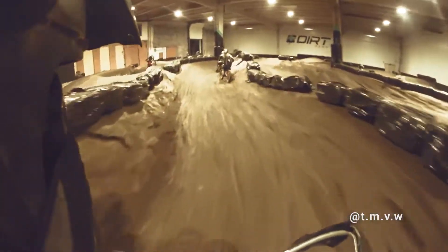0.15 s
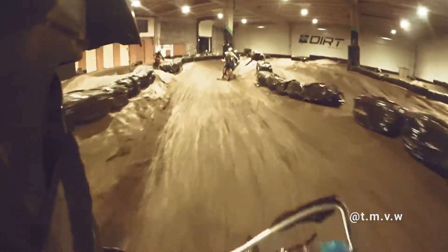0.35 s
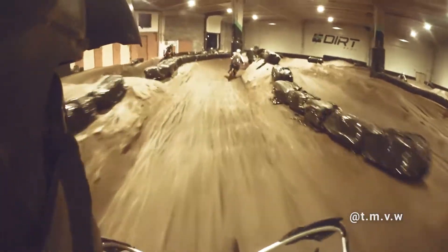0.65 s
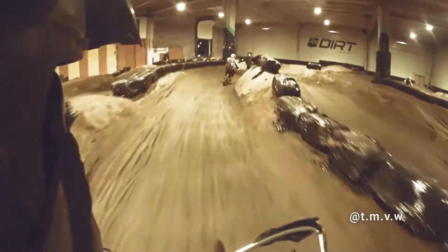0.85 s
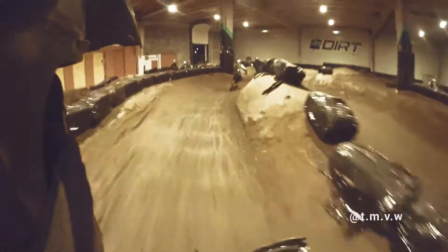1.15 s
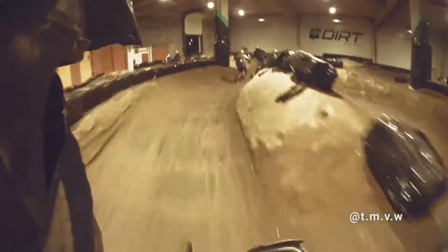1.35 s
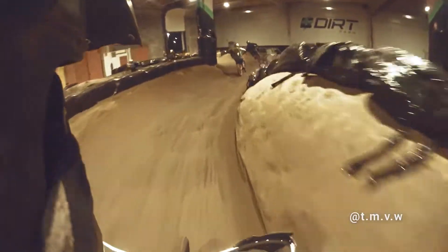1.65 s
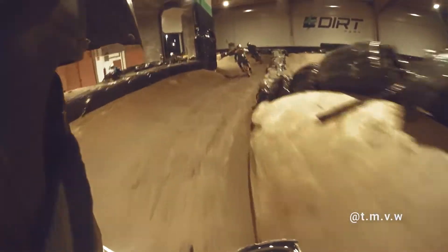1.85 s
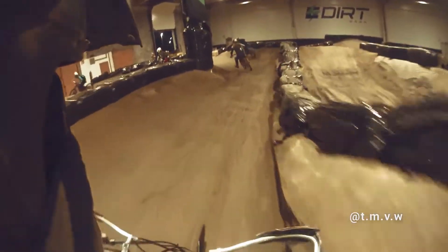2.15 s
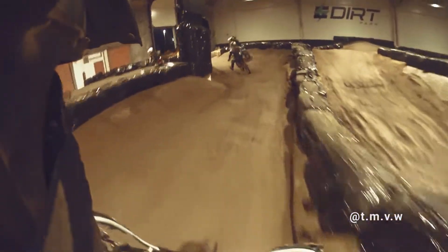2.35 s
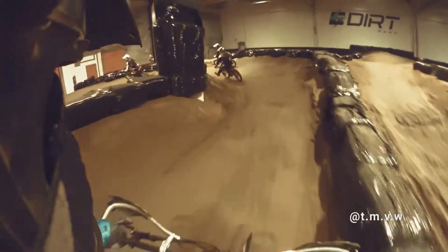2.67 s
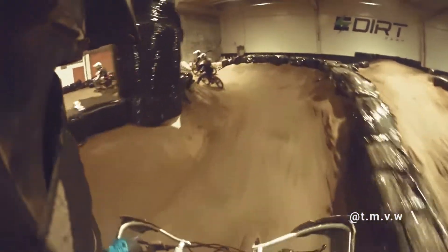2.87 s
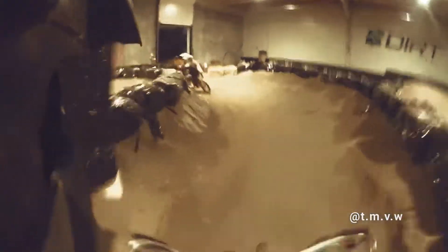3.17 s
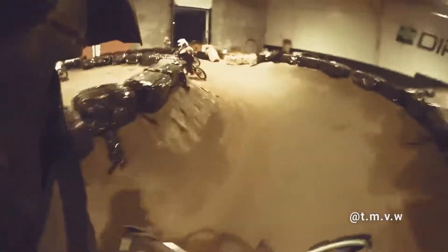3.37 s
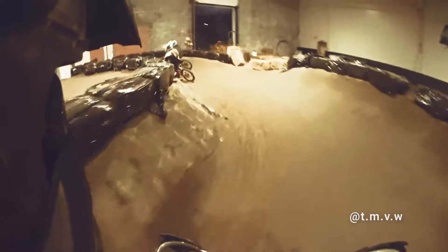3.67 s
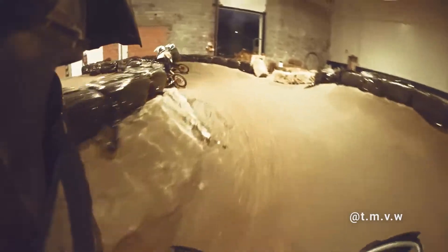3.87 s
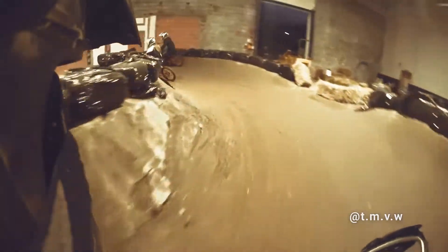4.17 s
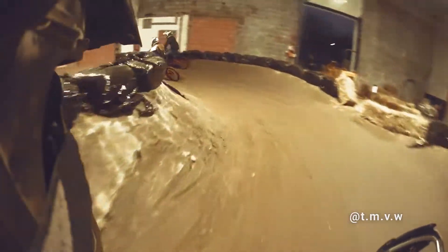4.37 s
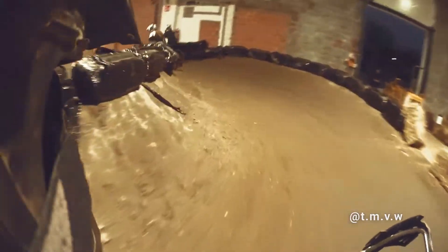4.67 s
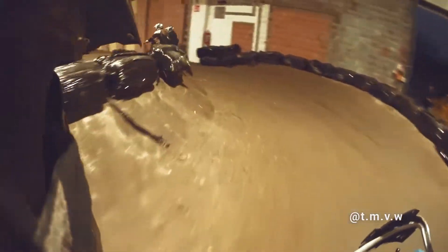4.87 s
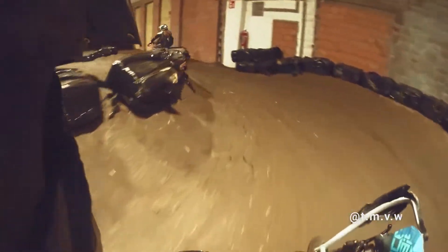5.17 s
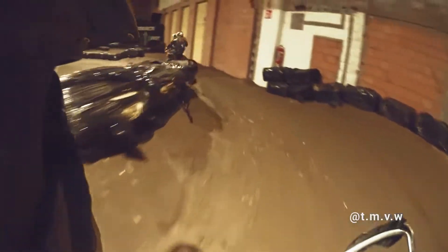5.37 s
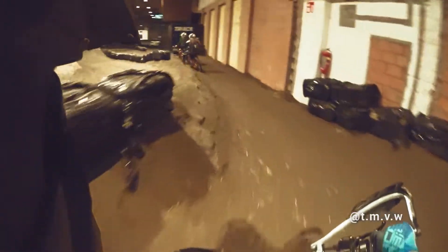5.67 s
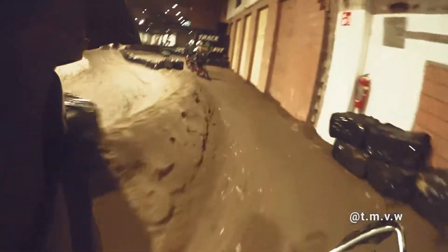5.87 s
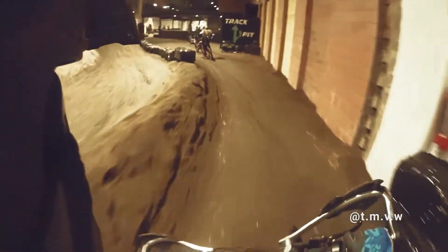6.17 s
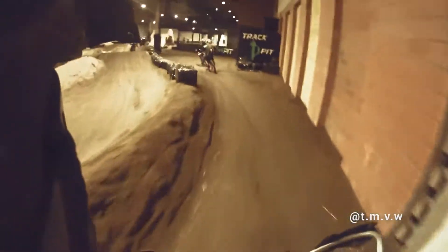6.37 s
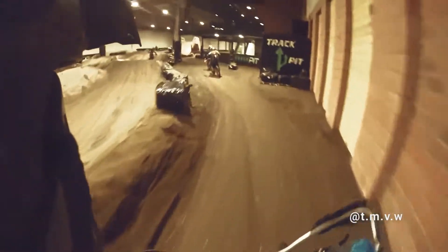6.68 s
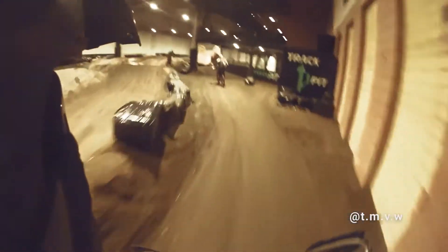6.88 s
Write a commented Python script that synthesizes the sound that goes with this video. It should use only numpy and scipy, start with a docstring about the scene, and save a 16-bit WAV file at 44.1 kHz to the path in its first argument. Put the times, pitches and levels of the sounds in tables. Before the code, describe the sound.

An electric dirt bike rides over bumps with low rumble and hiss, the helmet camera knocking and slamming loudly in its mount.

```python
"""A helmet camera knocking and slamming in its mount as an electric dirt bike rides over bumps in a hall.
Heard point-blank through the camera's own two microphone ports: each blow rings the plastic case,
the helmet padding answers with soft thuds, and a loose buckle ticks close by.
Underneath are tyre rumble, drive-train rush coloured by the case, chain hiss and a faint motor whine."""
import sys
import numpy as np
from scipy import signal
from scipy.fft import rfft, irfft, next_fast_len
from scipy.io import wavfile
from scipy.ndimage import uniform_filter1d, map_coordinates

SR = 44100
rng = np.random.default_rng(int(sys.argv[2]) if len(sys.argv) > 2 else 0)


def materialize(psi):
    """Save the field psi as 16-bit PCM at rate SR to the path in sys.argv[1].

    A 1-D psi becomes a single channel; in a 2-D psi each row is a channel.
    """
    bounded = np.clip(np.atleast_2d(psi).T, -1, 1)
    quanta = np.round(bounded * 32767).astype(np.int16)
    wavfile.write(sys.argv[1], SR, quanta)


N = 309924

# blows of the camera on its mount: start_s, force_db, hardness_db_per_octave, padding_thud_db
MOUNT_KNOCKS = [(0.223, -35.5, -17, -56), (0.27, -37, -17, -42), (1.125, -13.5, 1, -34.5),
                (1.147, -21.5, -8, -40), (1.224, -29, -4, -55), (1.552, -33, -2, -50),
                (2.129, -29, -4, -44), (2.367, -31.5, -7, -45), (2.853, -34, -2.5, -52),
                (2.932, -12.5, 1.5, -33), (2.956, -24, -8, -42), (3.033, -19, -9.5, -31),
                (3.075, -1.5, -9, -23), (3.118, -23, -5, -23.5), (3.123, -12, -2, -30),
                (3.144, -4, -13, -33), (3.184, -16, -2.5, -29), (3.233, -1, -8, -23),
                (3.281, -17, -5.5, -30), (3.357, -7.5, -2, -34.5), (3.406, -24.5, -3.5, -32),
                (3.444, -34.5, -19, -38), (3.52, -24.5, -10, -41), (3.656, -24.5, -7.5, -41),
                (4.016, -36, -11, -52), (4.44, -36, -8, -53), (5.095, -34, -11, -57),
                (5.237, -35, -15, -60), (5.454, -35.5, -11, -61), (5.493, -30.5, -11, -55),
                (6.075, -37, 6.5, -44.5), (6.268, -12, 2, -37), (6.313, -17.5, -11, -33.5),
                (6.401, -22, -11, -35), (6.457, -20, -9, -30.5), (6.535, -34, -18, -45),
                (6.761, -22, -12.5, -35), (6.86, -25, -10, -43), (6.964, -35.5, -14, -54)]
# tyres and drive train along the ride: time_s, rumble_db, rush_db
RIDE_LEVELS = [(0.0, -59.5, -52.5), (0.81, -58.5, -52.5), (1.06, -56, -50.5), (1.31, -57, -53.5),
               (1.59, -55, -53.5), (1.9, -60.5, -54.5), (2.47, -61, -56), (2.79, -57.5, -54.5),
               (3.6, -65.5, -57), (3.91, -63, -56.5), (4.2, -67.5, -56), (4.69, -68.5, -57.5),
               (5.05, -66.5, -54), (5.46, -69.5, -56), (5.85, -64.5, -51.5), (6.18, -66, -51.5),
               (6.44, -58.5, -51), (6.73, -58.5, -50), (7.03, -58, -51.5)]


def mount_knocks():
    """Each blow, and the scrape that trails it, rings the case; a short crack rides on the contact."""
    # from the force of a knock to the left port, then the right: gain_db
    port_db = [
        [14],
        [11],
    ]
    out, t = np.zeros((2, N)), np.arange(SR // 14) / SR
    no_bass = signal.butter(2, 240, "high", fs=SR, output="sos")
    crisp = signal.butter(2, [2000, 7500], "band", fs=SR, output="sos")
    for start_s, force_db, hardness, _ in MOUNT_KNOCKS:
        ring_share = np.clip(0.89 - 0.0051 * hardness, .2, 3)  # hard blows ring shorter
        crack_db = -15.5 + 1.24 * hardness - 0.18 * force_db  # harder and lighter blows crack more
        scrape_db = -28.5 - 0.37 * hardness  # softer ones scrape more
        tilt = lambda hz: amp(hardness * np.log2(np.maximum(hz, 800) / 1000))
        # the mount still grips the case at first and damps it hard; a weaker free ring outlasts that
        fade = lambda t60: decay(t, 0.35 * ring_share * t60) + amp(-16) * decay(t, ring_share * t60)
        ring = case_ring(t, tilt, fade)
        grit = rng.standard_normal((3, len(t)))
        force = amp(scrape_db) * decay(t, 0.031) * grit[2]
        force[0] = 1  # the blow itself
        body = signal.fftconvolve(ring, force[None], axes=1)[:, :len(t)]
        crack = signal.sosfilt(crisp, ports(grit[0], 0.44 * grit[1]))
        crack *= decay(t, 0.0045) + amp(-22) * decay(t, 0.015)
        knock = (body + amp(crack_db) * crack) * attack(t, 0.00087)
        add(out, start_s + .0006, amp(force_db) * amp(port_db) * knock)
    return signal.sosfilt(no_bass, out)


def mount_slams():
    """The mount bottoms out and rebounds in shrinking contacts, louder on the right, earlier on the left."""
    # first_contact_s, level_db, contact_gap_s, share_kept_per_contact
    slams = [(3.0785, 2.5, .0047, .52), (3.1467, 2, .0049, .47), (3.236, 3, .0055, .7),
             (3.3597, -1.5, .006, .44)]
    out, age = np.zeros((2, N)), np.arange(SR // 8) / SR
    sharp_hz, broad_hz, lead_s = 430, 190, np.array([[.0006], [0]])
    t, sharp = pulse(sharp_hz, 0.42, lead_s)
    contact = amp([[-8], [-1.5]]) * sharp * np.cos(2 * np.pi * sharp_hz * t)
    t, broad = pulse(broad_hz, 0.11, lead_s / 2)
    contact += amp([[-17], [-13]]) * broad * np.cos(2 * np.pi * broad_hz * t)
    walls = lambda hz: np.exp(-np.log(hz / 1080) ** 2 / 0.12)  # a broad contact drives only wall modes
    for start_s, db, gap_s, kept in slams:
        for bounce in range(4):
            add(out, start_s - .03 + bounce * gap_s, -amp(db) * kept ** bounce * contact)
        ring = case_ring(age, walls, lambda t60: decay(age, 1.27 * t60) * attack(age, 0.0013))
        add(out, start_s - .0015, amp(db - 11) * ring)
    return out


def case_ring(t, strength, fade):
    """The plastic case ringing at both ports, peak 1; the blow sets strength(hz) and fade(t60)."""
    # pitch_hz, free_t60_s, left_db, right_db, left_lead_rad
    case_modes = [(310, 0.055, 2, -4, 3.5), (565, 0.045, -5.5, 8, 8), (660, 0.054, 0, -7, 2.5),
                  (917, 0.069, 5.5, 0.5, 3.5), (1043, 0.04, 3, 17, -2.5), (1134, 0.034, 12, 10, -2.5),
                  (1393, 0.027, 8, 16.5, 3.5), (1620, 0.016, 12, 21, 1.5), (2020, 0.0081, 22, 19.5, 1.14),
                  (2550, 0.004, -1, -13, -7), (2480, 0.062, 0, 1, 1.54), (3220, 0.0098, -28, -9, 2),
                  (4700, .01, -19, -21, -11), (5100, 0.012, -19, -6, -18), (5700, 0.012, -5, -4, 13),
                  (7300, .008, -12, -24.5, -13)]
    hz, t60, left_db, right_db, lead = np.transpose(case_modes)[:, :, None]
    envelope = amp(rng.normal(0, 2, hz.shape)) * strength(hz) * fade(t60)
    phase = 2 * np.pi * hz * t
    left = (amp(left_db) * envelope * np.sin(phase + lead)).sum(0)
    right = (amp(right_db) * envelope * np.sin(phase)).sum(0)
    ring = -np.array([left, right])
    return ring / np.abs(ring).max()


def padding_thuds():
    """The padding takes each jolt as about one low cycle, roughened by crushed foam."""
    # further padding thuds, some following knocks and slams, some on their own: centre_s, level_db, pitch_hz
    jolts = [(0.226, -46, 190), (0.999, -41, 188), (1.15, -37, 269), (1.42, -45.5, 161), (1.697, -46, 226),
             (2.582, -39.5, 256), (2.688, -41, 269), (2.736, -39.5, 187), (2.81, -46, 166),
             (3.103, -28, 197), (3.223, -28, 103), (3.288, -21, 100), (3.332, -34, 129),
             (4.047, -48.5, 242), (4.41, -45.5, 186), (4.701, -44.5, 234), (4.853, -44.5, 186),
             (5.098, -44.5, 174), (5.238, -40, 279), (5.696, -42.5, 249), (5.862, -42.5, 201),
             (6.232, -42, 210), (6.45, -47, 95), (6.767, -38, 277)]
    out = np.zeros((2, N))
    muffle = signal.butter(2, 900, fs=SR, output="sos")
    # it answers a hard knock at once and tight, a soft one late and low
    answers = [(s + 0.0041, db, 178) if hardness > -1.5 else (s + .017, db, 118)
               for s, _, hardness, db in MOUNT_KNOCKS]
    faint = [(.05 + when * N / SR * .98, -52.5 + 6 * size, 159 * 2 ** octaves)
             for when, size, octaves in rng.random((16, 3)) - [0, .5, .5]]
    for centre_s, db, hz in jolts + answers + faint:
        t, envelope = pulse(hz, cycles=0.44)
        crush = signal.sosfilt(muffle, rng.standard_normal(len(t)))
        thud = envelope * (crush - np.sin(2 * np.pi * hz * t + 1.2))
        add(out, centre_s - .03, amp([[db + 1.5], [db - .8]]) * thud)
    return out


def buckle_ticks():
    """A loose metal buckle strikes: a click and narrow modes, at new strengths each time."""
    # pitch_hz, nominal_width_hz, level_db
    buckle_modes = [(5210, 300, -9), (5820, 250, -13), (6530, 300, 0), (7350, 260, -4), (7900, 300, -8),
                    (8730, 300, -9), (9500, 400, -12)]
    # strikes that each bounce once: start_s, level_db
    ticks = [(0.5252, -47), (0.9394, -38.5), (1.006, -41), (1.057, -36), (1.2156, -41), (1.2294, -42),
             (1.5579, -44), (1.5864, -42), (1.604, -41), (1.6666, -39.5), (1.7452, -37), (1.858, -36),
             (1.88, -39.5), (2.0288, -42), (2.073, -44), (2.137, -42), (2.143, -32.5), (2.258, -39.5),
             (2.4055, -40), (2.5472, -43), (2.811, -47), (3.0944, -41), (3.1911, -34), (3.3937, -41),
             (6.1055, -43), (6.2023, -41), (6.5585, -43), (6.6426, -44)]
    out, t = np.zeros((2, N)), np.arange(SR // 30) / SR
    hz, width_hz, mode_db = np.transpose(buckle_modes)[:, :, None]
    scatter_db = 3
    rebounds = [(s + .011 * rng.uniform(0.89, 1.0), db - 13 + rng.normal(0, scatter_db))
                for s, db in ticks]
    faint = [(rng.uniform(.3, 3.0), -46 + rng.normal(0, scatter_db)) for _ in range(8)]
    for start_s, db in ticks + rebounds + faint:
        strength, offset, spread = rng.standard_normal((3, len(hz), 1))
        envelope = amp(mode_db + scatter_db * strength) * np.exp(-.6 * np.pi * width_hz * t)
        phase = 2 * np.pi * hz * t + 3 * offset
        click = amp(-6) * decay(t, 0.0081) * np.diff(rng.standard_normal(len(t) + 2), 2)
        ring = np.array([(envelope * np.sin(phase + side * 0.51 * spread)).sum(0) for side in (1, -1)])
        add(out, start_s, amp(db) * (ring + click) * attack(t, 0.00147))
    return out


def helmet_rattle():
    """How hard the helmet still shakes from the knocks before, as a gain curve."""
    t = np.arange(N) / SR
    return sum(amp(db) * decay(np.abs(t - s), t60=0.29) * (t > s) for s, db, *_ in MOUNT_KNOCKS)


def tyre_rumble(ground, rattle):
    """Tyres rolling over rough ground: a low, lumpy noise, nearly alike at both ports."""
    # frequency_hz, level_db
    spectrum = [(18, -25), (30, -3.5), (129, -4), (194, -3), (330, -3), (430, -6.5), (730, -120)]
    rumble_db, _ = curves(RIDE_LEVELS)
    rumble = ports(cavity_noise(spectrum, 2, 3), amp(-11) * cavity_noise(spectrum, 2, 3))
    lumps_db = 1.2 * ground + 1.5 * wobble(30)
    return (amp(rumble_db) + amp(-36.5) * rattle) * amp(lumps_db) * rumble


def drive_rush(ground, rattle):
    """The midrange rush of the drive train, coloured by the case."""
    # spectra in phase and out of phase at the ports: frequency_hz, level_db
    shared = [(150, -25.5), (250, -19), (402, -8), (512, -1.5), (763, -5), (842, -3.5), (1110, -4),
              (1250, -6), (1650, -4), (2110, -9), (2810, -15), (3130, -15.5), (3500, -23), (4550, -82),
              (7700, -120)]
    opposed = [(71, -55), (120, -30.5), (322, -10), (404, -10), (559, -8.5), (752, -10), (853, -4),
               (969, -12.5), (1320, -4.5), (1800, -11.5), (2110, -14.5), (3170, -23), (3500, -23),
               (4550, -45), (7700, -120)]
    _, rush_db = curves(RIDE_LEVELS)
    rush = ports(cavity_noise(shared, 1.47, 0.71), amp(2) * cavity_noise(opposed, 1.4, 2.8))
    return (amp(rush_db) + amp(-44) * rattle) * amp(0.52 * ground) * rush


def chain_hiss(ground, rattle):
    """The high hiss of chain and tyre, surging with the throttle."""
    # spectra in phase and out of phase at the ports: frequency_hz, level_db
    shared = [(1940, -48), (3300, -8), (3710, -8.5), (4460, -2.5), (5690, -3), (7580, -8), (8090, -10),
              (8860, -9.5), (11000, -17.5), (14300, -48), (22000, -120)]
    opposed = [(1940, -34), (3300, -10), (3510, -9.5), (5330, -3), (7130, -12.5), (8950, -15.5),
               (11000, -24), (14300, -50), (22000, -120)]
    # time_s, level_db
    surges = [(0, -57.5), (.21, -61), (.53, -61), (.89, -56), (1.39, -62), (2.27, -61.5), (3.01, -62),
              (3.7, -64), (3.95, -59), (4.15, -62.5), (4.36, -58), (4.62, -62.5), (4.92, -58), (5.22, -61),
              (5.42, -62), (5.77, -57), (6.05, -57), (6.5, -56.5), (6.71, -54), (7.03, -56.5)]
    hiss_db, = curves(surges)
    hiss = ports(cavity_noise(shared, 0.61, 0.36), amp(-4) * cavity_noise(opposed, 1.2, .9))
    flicker_db = 0.75 * ground + 0.67 * wobble(40)
    return (amp(hiss_db) + amp(-54.5) * rattle) * amp(flicker_db) * hiss


def motor_whine():
    """A fuzzy motor tone and its octave, growing as the throttle opens."""
    # time_s, pitch_hz, level_db
    throttle = [(0, 563, -67), (.5, 569.7, -69.5), (1.0, 542, -56.5), (1.3, 546, -65), (4.7, 502, -97.5),
                (4.9, 506, -64), (5.66, 523, -62.5), (6.15, 520, -62), (6.5, 544, -58.5), (7.03, 590, -60)]
    hz, db = curves(throttle)
    phase = 2 * np.pi * np.cumsum(hz + 14 * wobble(55)) / SR
    tone = np.sin(phase) + amp(-6) * np.sin(2 * phase)
    return amp(db + 3.7 * wobble(25)) * tone


def cavity_noise(spectrum, patchy_db, grainy_db):
    """Coloured noise of rms 1, with patches of random gain and a grain of tiny jolts."""
    # narrow resonances that the noise keeps ringing: centre_hz, width_hz, lift_db
    resonances = [(860, 60, 3), (1100, 90, 4), (1660, 110, 5), (3080, 150, 3), (4450, 200, 4),
                  (5650, 200, 2.5)]
    bins = signal.stft(rng.standard_normal(N), nperseg=512)[2]
    patches = uniform_filter1d(rng.standard_normal(bins.shape), size=6, axis=0)
    patches = unit_rms(uniform_filter1d(patches, size=12, axis=1))
    patchy = signal.istft(bins * amp(patchy_db * patches), nperseg=512)[1][:N]
    grainy = patchy * amp(grainy_db * wobble(260))
    knot_hz, knot_db = np.transpose(spectrum)
    colour_db = lambda hz: np.interp(np.log(hz + 1), np.log(knot_hz + 1), knot_db)
    lift_db = lambda hz: sum(db / (1 + (2 * (hz - mid) / width) ** 2) for mid, width, db in resonances)
    return unit_rms(filtered(grainy, lambda hz: amp(colour_db(hz) + lift_db(hz))))


def amp(db):
    """dB to gain."""
    return 10 ** (np.asarray(db) / 20)


def unit_rms(x):
    """Scaled to rms 1."""
    return x / np.sqrt(np.mean(x ** 2) + 1e-20)


def attack(t, rise_s):
    """A smooth rise from 0 to 1."""
    return 1 - np.exp(-(t / rise_s) ** 2)


def decay(t, t60):
    """A fall of 60 dB every t60 seconds."""
    return amp(-60 * t / t60)


def pulse(hz, cycles, lead_s=0.):
    """Time axis and bell envelope of a pressure pulse, centred 30 ms in, less lead_s."""
    t = np.arange(int(.06 * SR)) / SR - .03 + lead_s
    return t, np.exp(-(t * hz / cycles) ** 2)


def curves(rows):
    """One value per sample for each column after the time."""
    time_s, *columns = np.transpose(rows)
    return [np.interp(np.arange(N) / SR, time_s, column) for column in columns]


def wobble(rate):
    """A smooth random curve, rate knots a second."""
    return map_coordinates(rng.standard_normal(int(N * rate / SR) + 4), [np.arange(N) * rate / SR])


def filtered(x, response):
    """x shaped by the gain response(hz)."""
    size = next_fast_len(N + SR // 2)
    return irfft(rfft(x, size) * response(np.fft.rfftfreq(size, 1 / SR)), size)[..., :N]


def ports(shared, opposed):
    """Left and right from a shared part and an opposed part."""
    return np.array([shared + opposed, shared - opposed])


def add(track, start_s, sound):
    """Mixes a two-channel sound into the track."""
    part = track[:, round(start_s * SR):][:, :sound.shape[1]]
    part += sound[:, :part.shape[1]]


def scene():
    """All sources at the two ports; the same rough ground and rattle shake rumble, rush and hiss."""
    ground, rattle = wobble(15), helmet_rattle()
    ride = tyre_rumble(ground, rattle) + drive_rush(ground, rattle) + chain_hiss(ground, rattle)
    return ride + motor_whine() + mount_knocks() + mount_slams() + padding_thuds() + buckle_ticks()


def record(dry):
    """The camera sheds the deepest bass and the top; the hardest slams clip and splash above the band."""
    band_hz, splash_hz, ceiling = 11030, 15000, .99
    thin = signal.sosfilt(signal.butter(3, 44, "high", fs=SR, output="sos"), dry)
    band = filtered(thin, lambda hz: hz < band_hz)
    clipped = np.clip(band, -ceiling, ceiling)
    return filtered(clipped, lambda hz: 1 / (1 + (hz / splash_hz) ** 24))


dry = scene()
out = record(dry)
materialize(out)
```